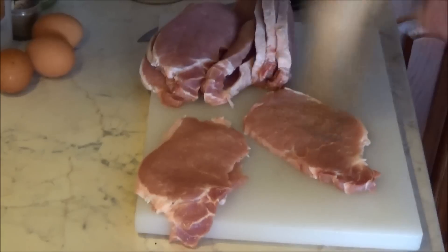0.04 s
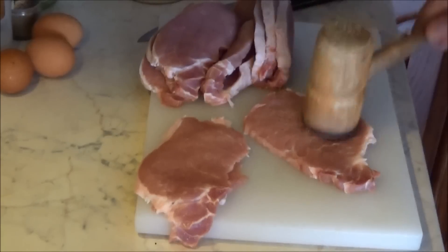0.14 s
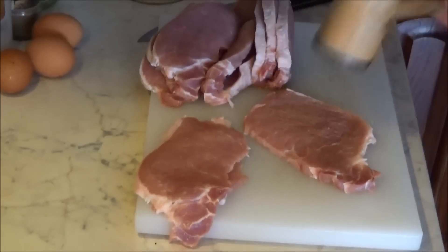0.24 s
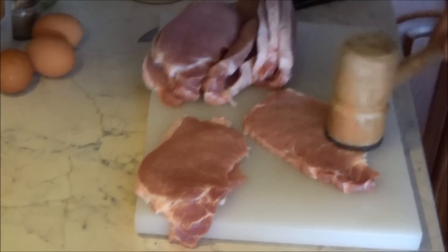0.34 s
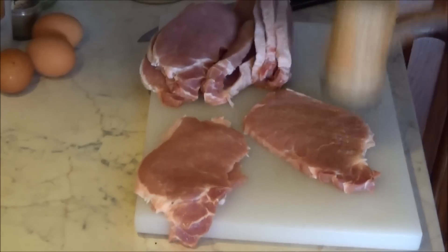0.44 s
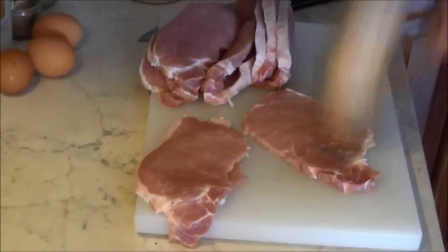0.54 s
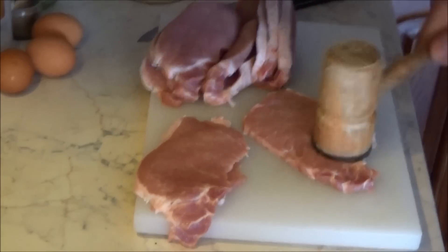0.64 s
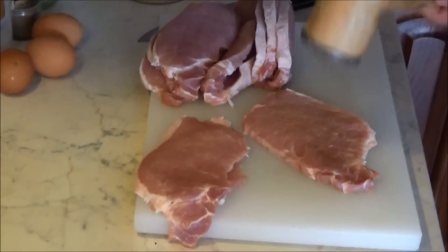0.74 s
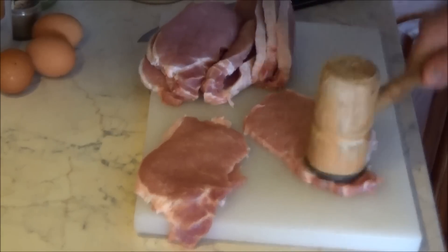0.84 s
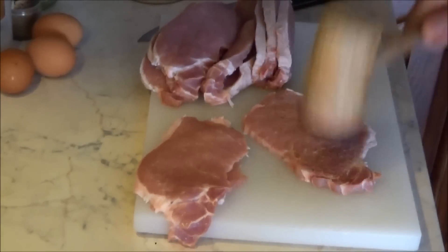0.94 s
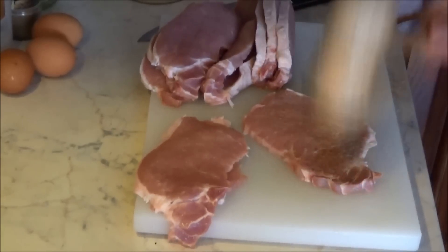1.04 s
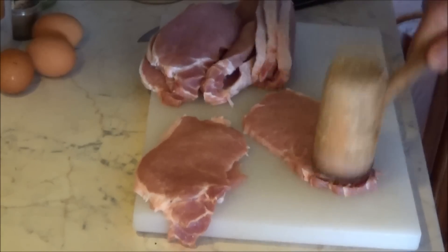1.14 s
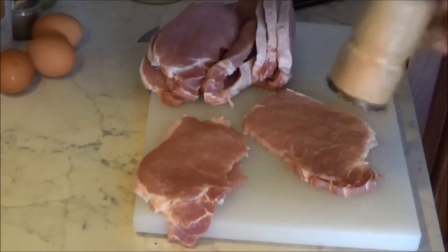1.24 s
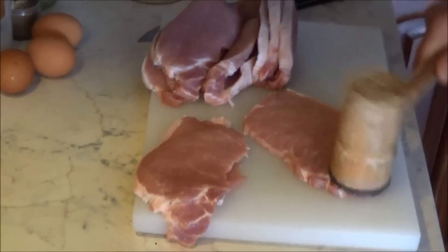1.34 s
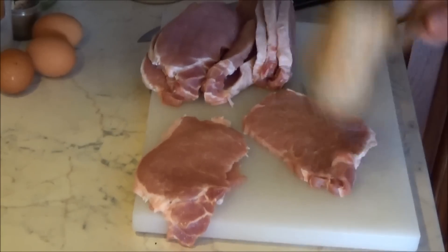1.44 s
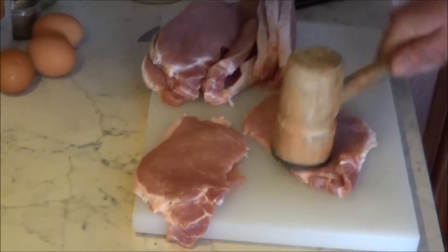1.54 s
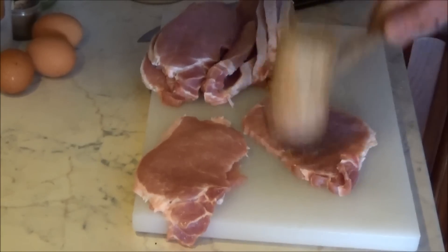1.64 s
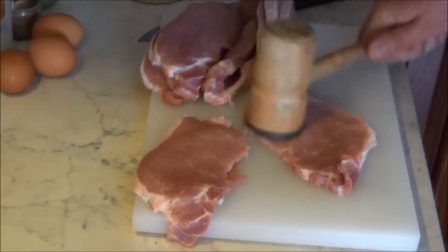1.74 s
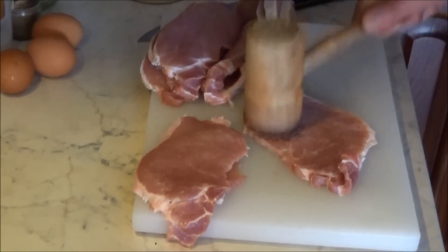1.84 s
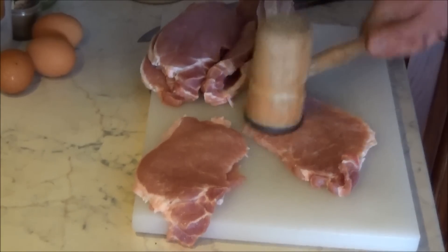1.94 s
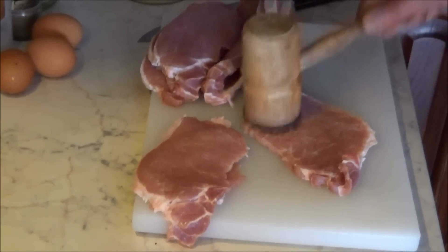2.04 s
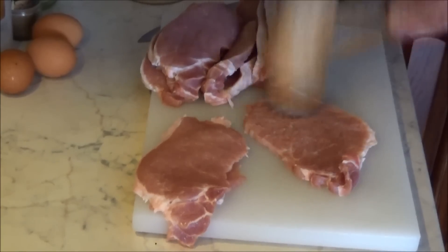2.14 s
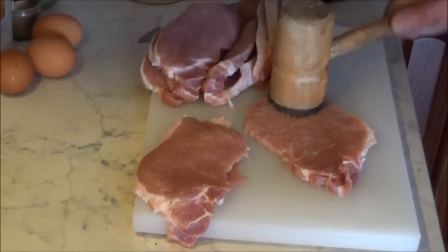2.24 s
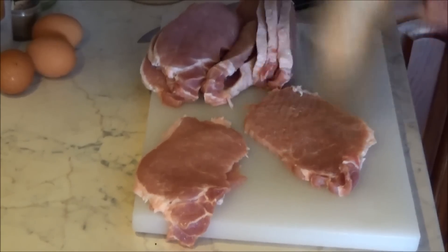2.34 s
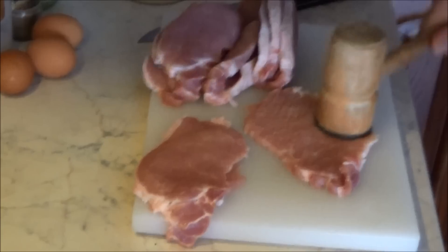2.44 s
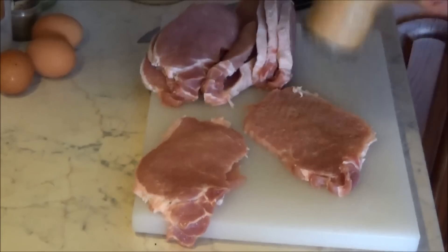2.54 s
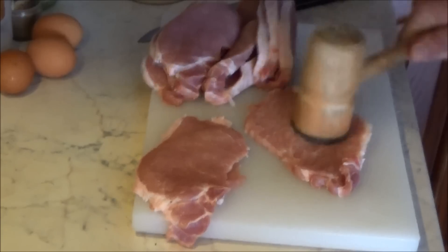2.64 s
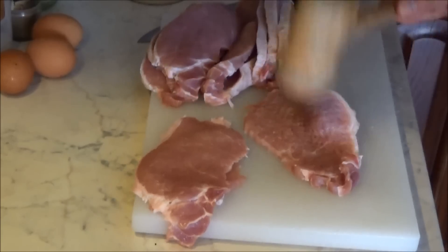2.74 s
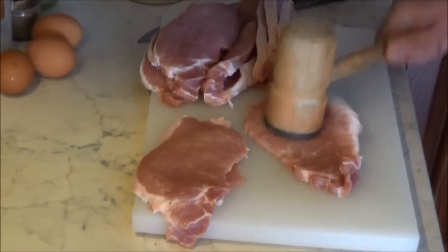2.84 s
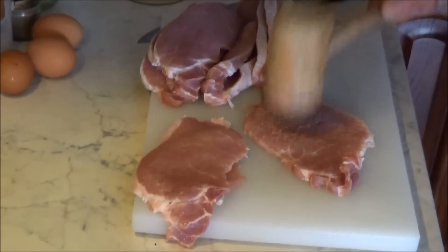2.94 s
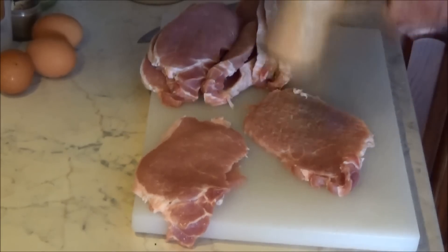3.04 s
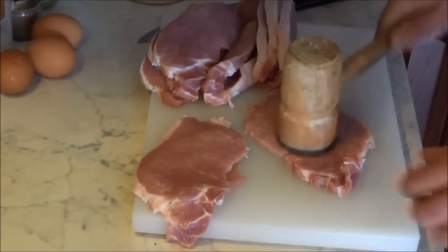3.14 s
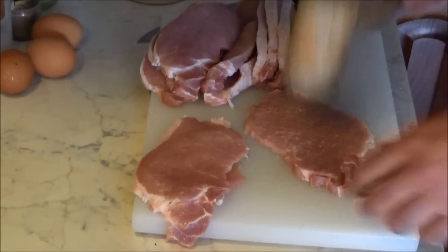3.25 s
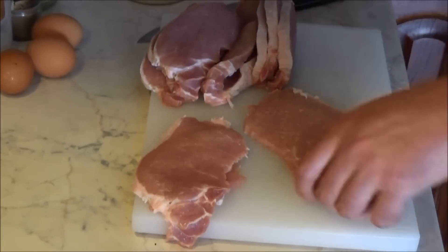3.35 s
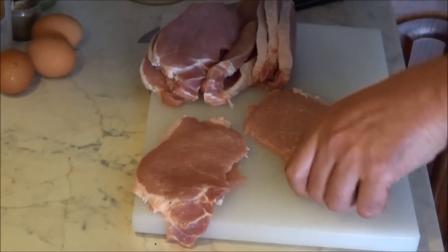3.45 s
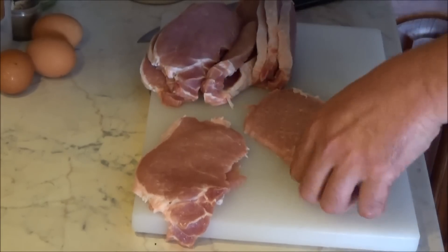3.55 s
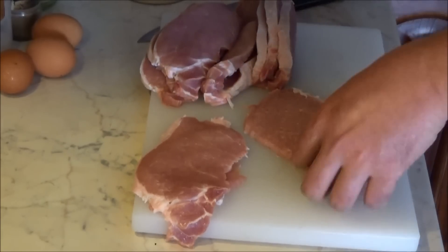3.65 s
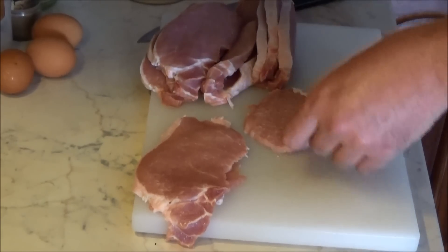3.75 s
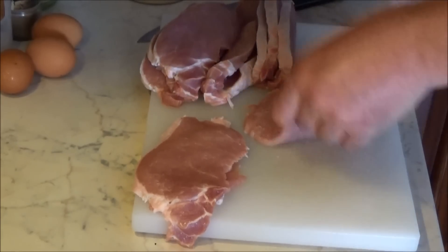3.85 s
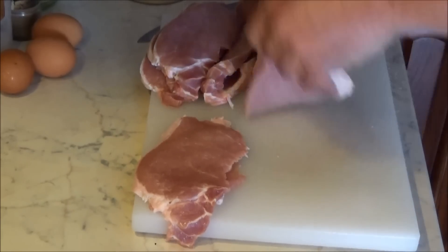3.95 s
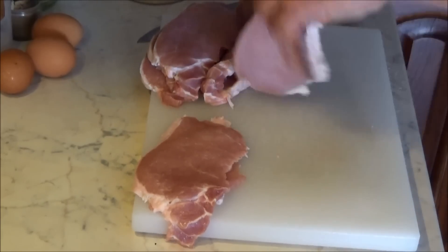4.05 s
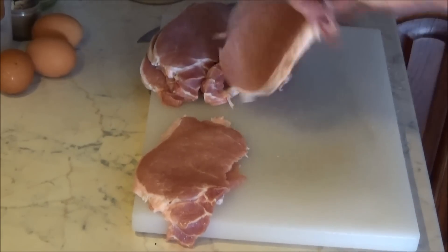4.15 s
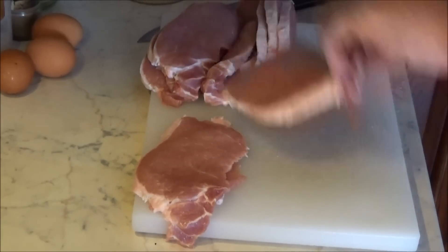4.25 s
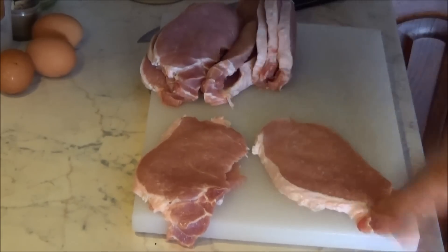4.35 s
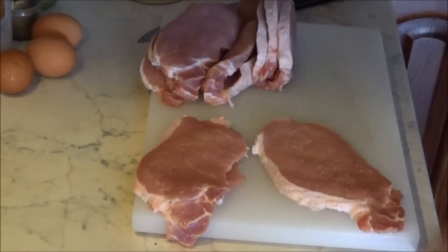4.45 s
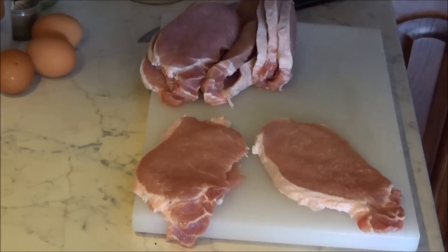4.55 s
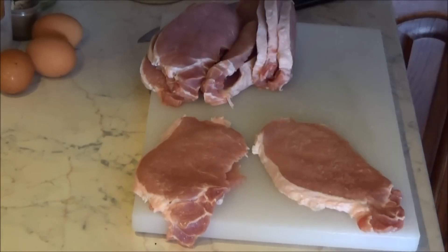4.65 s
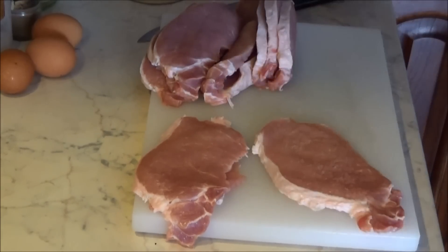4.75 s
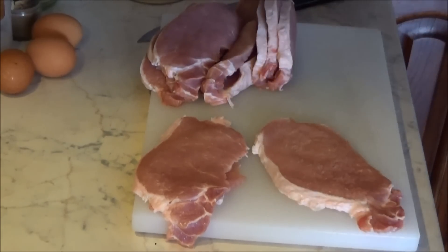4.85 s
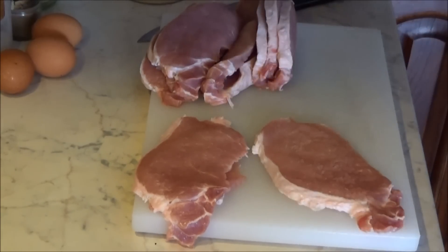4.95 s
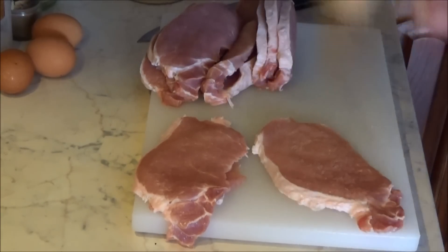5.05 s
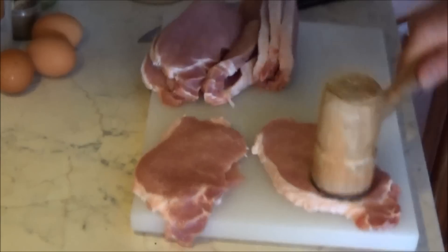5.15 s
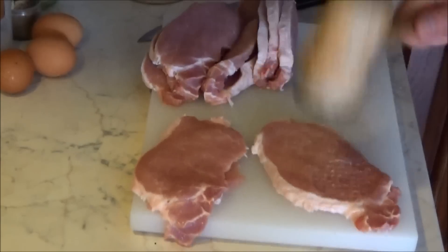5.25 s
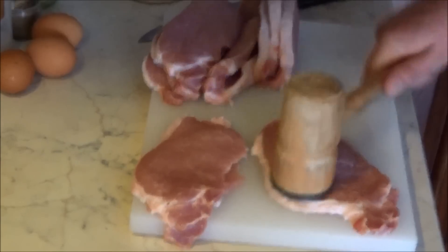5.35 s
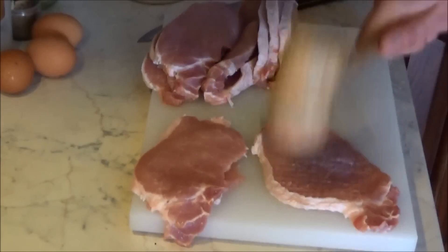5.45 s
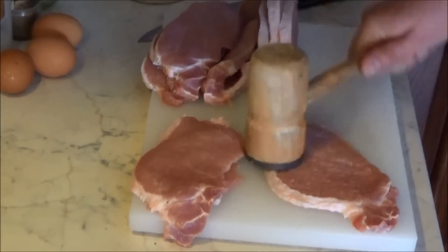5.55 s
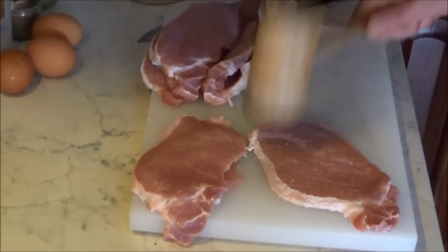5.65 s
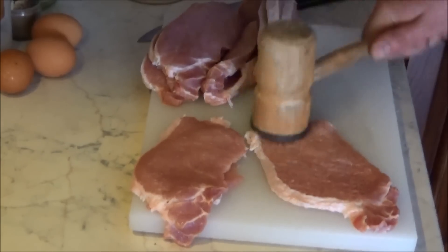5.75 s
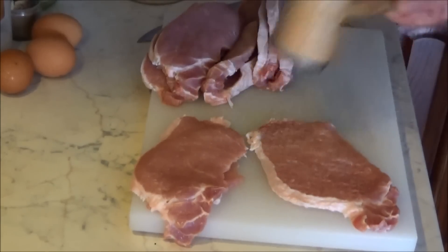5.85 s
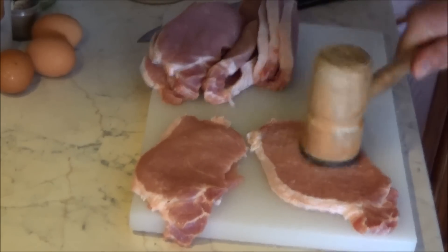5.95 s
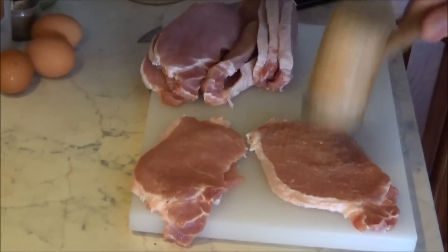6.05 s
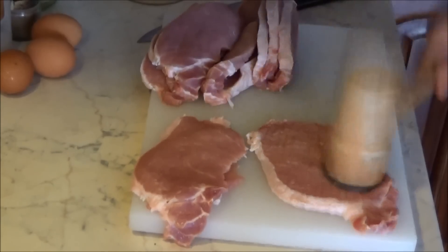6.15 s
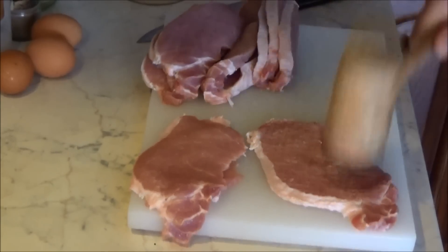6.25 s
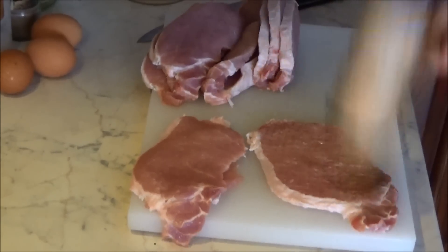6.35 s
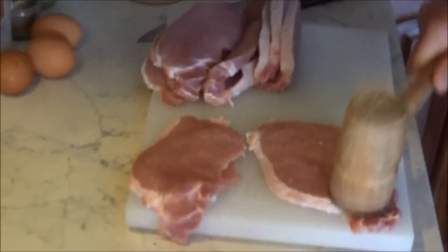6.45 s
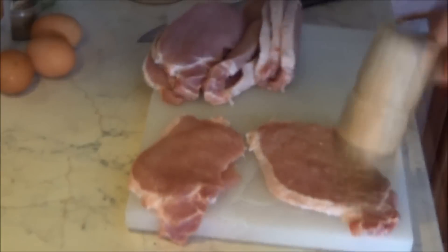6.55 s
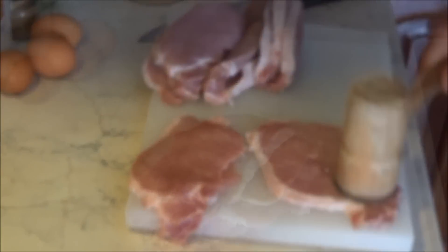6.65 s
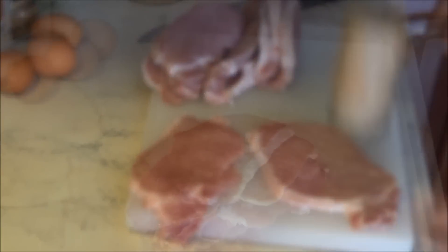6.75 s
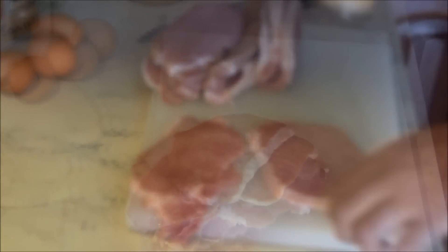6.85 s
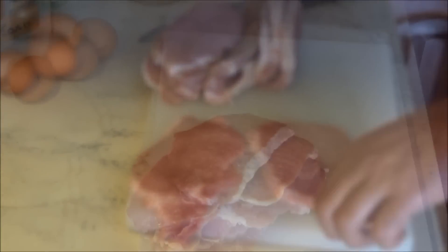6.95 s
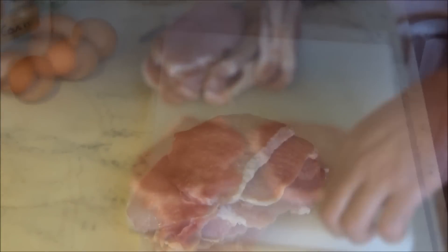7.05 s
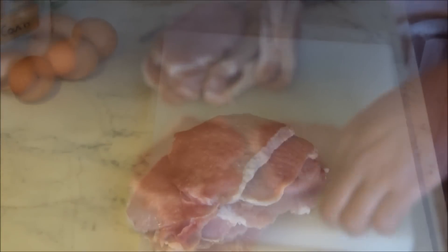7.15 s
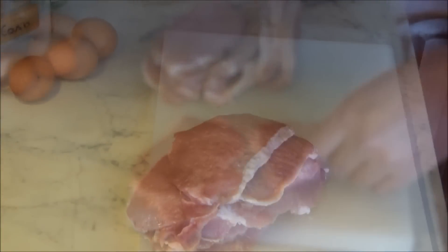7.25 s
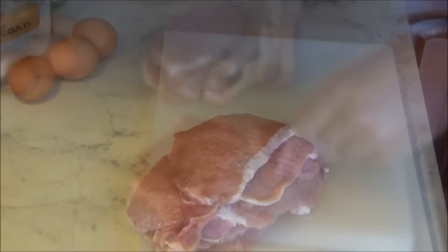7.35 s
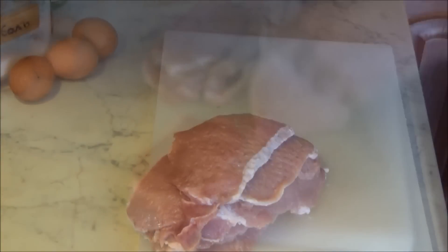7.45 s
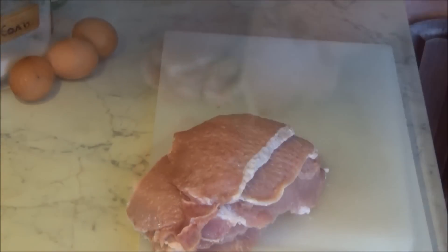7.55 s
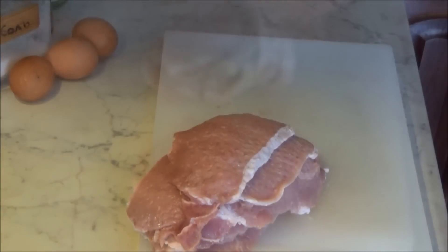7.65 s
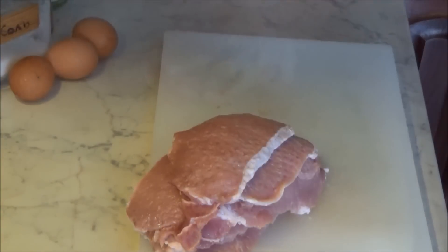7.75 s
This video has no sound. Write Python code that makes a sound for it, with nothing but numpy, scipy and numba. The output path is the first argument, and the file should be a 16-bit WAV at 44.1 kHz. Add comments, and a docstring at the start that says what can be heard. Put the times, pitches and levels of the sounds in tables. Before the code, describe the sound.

Fast, regular mallet blows thud and smack on meat, making the counter shudder and loose crockery clink in a lively small room. A quiet gap holds faint hum, sticky peeling and one dry, close wet slap. Eight more blows come, the first strong, then a rough moist rustle with sharp crackles ends it. Recorded close in stereo, with peaks flattened.

```python
"""Mallet blows are heard first: a wooden mallet pounds pork on a plastic board on a kitchen counter.
Each cracks as shaped noise, booms in cabinet modes, rattles ringing crockery and decays in a tiled room.
Between two runs of blows a hand peels the slice off, as grains and crackles of noise, and slaps it down;
at the end hands rustle and a faint drone sets in. Noise and mains tones hum under it all, with an even tick.
Two ports receive the mixture and a limiter flattens the blows."""
import sys
import numpy as np
from scipy import signal
from scipy.fft import rfft, irfft, next_fast_len
from scipy.io import wavfile
from numba import njit

SR = 44100
rng = np.random.default_rng(int(sys.argv[2]) if len(sys.argv) > 2 else 0)


def dump(signal):
    """Clip the signal to [-1, 1] and save it as 16-bit WAV at the path in sys.argv[1]."""
    limited = np.clip(np.atleast_2d(signal).T, -1, 1)
    pcm = np.round(limited * 32767).astype(np.int16)
    wavfile.write(sys.argv[1], SR, pcm)


N = 343362


def undb(db):
    """Level to amplitude: 20 dB is a factor of ten."""
    return 10 ** (np.asarray(db) / 20)


def at(hz, table, column=1):
    """Logarithmic pitch: interpolate a table column along log frequency, holding the end values."""
    table = np.array(table, float)
    return np.interp(np.log(hz), np.log(table[:, 0]), table[:, column])


def over_time(table):
    """Level envelope: amplitude at every sample from a table of (time [s], level [dB])."""
    return undb(np.interp(np.arange(N) / SR, *np.transpose(table)))


def spikes(s, size):
    """Impulse excitation: single-sample impulses at the given times."""
    index = np.clip((np.asarray(s) * SR).astype(int), 0, N - 1)
    return np.bincount(index, size, N)


def fade(x, t60):
    """Exponential decay: each impulse dies away by 60 dB in t60 seconds."""
    return signal.lfilter([1], [1, -1000 ** (-1 / (t60 * SR))], x)


def ring(x, hz, t60):
    """Damped resonance: a unit impulse sets off one decaying sine whose envelope starts at 1."""
    r, w = 1000 ** (-1 / (t60 * SR)), 2 * np.pi * hz / SR
    return signal.lfilter([np.sin(w)], [1, -2 * r * np.cos(w), r * r], x)


def lumps(rate):
    """Random modulation: normal random knots, rate per second, joined by straight lines."""
    knots = int(N / SR * rate) + 2
    return np.interp(np.arange(N) / SR * rate, np.arange(knots), rng.standard_normal(knots))


# third-octave band centres [Hz]
BANDS_HZ = 30 * 2 ** (np.arange(28) / 3)


def noise(colour, shape=None, count=N):
    """Filtered noise: two unrelated rows of rms 1; shape(hz), if given, is each third octave's envelope."""
    size = next_fast_len(count)
    f = np.maximum(np.arange(size // 2 + 1) * SR / size, 1)
    spectrum = rfft(rng.standard_normal((2, size))) * undb(at(f, colour))
    spectrum /= np.sqrt(np.mean(abs(spectrum) ** 2) / size)
    if shape is None:
        return irfft(spectrum, size)[:, :count]
    thirds = 3 * np.log2(f)
    total = 0
    for hz in BANDS_HZ:
        # triangular bands overlap so that neighbours add up to one
        band = np.clip(1 - abs(thirds - 3 * np.log2(hz)), 0, 1)
        total = total + shape(hz) * irfft(spectrum * band, size)[:, :count]
    return total


# Mallet blows: (time [s], strength [dB], then accents of this blow: board thud [dB], flat smack [dB],
# bright hiss [dB], dishes rattling [dB], woody ring [dB])
MALLET_BLOWS = [(0.0, -26.5, 6, 0.5, -7, 6.5, 4.5), (0.258, -25, 2, -4, 16, -1, 4),
                (0.4957, -26.5, 1.5, -8, -6, 0, 1.5), (0.77, -25, -4, 0, 0, 3, 1),
                (1.024, -30.5, -5, 1.5, 20, -11, -10), (1.259, -30, -3.5, 11.5, -3.5, 0, -5),
                (1.481, -29.5, -2.5, -6.5, 4, -3, -8), (1.7237, -33.5, 0.5, 12.5, 0, -9, -2),
                (1.934, -33.5, 2, -9, 9, -3, -1.5), (2.148, -32.5, 2.5, -6, 15, 6.5, -2),
                (2.361, -31, 4.5, 3, -8, 2, -9), (2.578, -31, 0, 4, -6.5, 2, -1),
                (2.811, -31, 1.5, -3, -2.5, 7.5, 3), (3.029, -34, -1, -2.5, 15, -4.5, -0.5),
                (3.267, -32, 1.5, 0.5, 13.5, 2, -14), (5.278, -22, -3, 5, -3, 9, 3),
                (5.52, -31, -4.5, 10, 5, 5, -2), (5.718, -33.5, 4, 2, 7, -2, 2),
                (5.921, -32.5, 7, -1, -5, 6.5, -1), (6.137, -34, -4.5, -1, 28, 7, -15),
                (6.356, -30, -8.5, 10, 19, 3, 4.5), (6.579, -27.5, -1.5, 2, -1.5, 5, -1.5),
                (6.784, -28.5, -7, -4.5, 6.5, -10, -4)]
# How a blow spreads over pitch; the more the board thuds, the less the cabinets boom:
# (frequency [Hz], level against strength [dB], share of thud [1], share of smack [1], share of hiss [1])
BLOW_SPREAD = [(98.7, -3.5, -0.35, 0, 0.048), (279, 4, 1, 0, 0.074), (392, 4.5, 0.18, 0, 0),
               (1010, 4.5, -0.02, 0.37, 0), (1370, 1, 0.53, 1, 0), (1620, 3, 0.38, 0.85, 0.086),
               (1970, -2, 0.12, 0.25, 0), (5640, -1.5, 0.41, 0.23, 0.17), (12330, 9.5, 0.56, 0.11, 0.29)]


def part(hz):
    """Impact spectrum: amplitude of every blow at this pitch, from its strength and accents."""
    strength_db, *accents_db = np.array(MALLET_BLOWS)[:, 1:5].T
    db = strength_db + at(hz, BLOW_SPREAD)
    for column, accent in enumerate(accents_db, 2):
        db = db + accent * at(hz, BLOW_SPREAD, column=column)
    return undb(db)


# Reverberation of the tiled kitchen: (frequency [Hz], decay by 60 dB [s], build-up time constant [ms])
KITCHEN_DECAY = [(60, 0.37, 28), (205, 0.45, 6.8), (620, 0.39, 17.8), (2050, 0.42, 10.4), (7540, 0.39, 9.8),
                 (15200, 0.26, 5)]


def in_kitchen(hits, hz, wet_db, crack_s):
    """Reverberation: a short crack plus a tail that builds up, slowest in the bass, and decays."""
    rise = at(hz, KITCHEN_DECAY, column=2) / 1000 * np.log(1000)  # time constant to t60
    tail = fade(hits, at(hz, KITCHEN_DECAY)) - fade(hits, rise)
    return fade(hits, crack_s + 8 / hz) + undb(wet_db) * tail


# Colour of the blows: (frequency [Hz], relative level per Hz [dB])
BLOW_COLOUR = [(28, -32), (48, 10), (201, -3.5), (352, -4), (866, -11), (1340, -8), (4100, -11),
               (5630, -11.5), (7000, -20.5), (11700, -22), (16000, -31.5)]


def crack_and_wash(s):
    """Diffuse sound field: the crack and room tail of every blow as noise, each band swelling at random."""
    def envelope(hz):
        return undb(1.9 * lumps(40)) * in_kitchen(spikes(s, part(hz)), hz, wet_db=11.0, crack_s=0.038)
    return undb(13.5) * noise(BLOW_COLOUR, envelope)


def snap(s):
    """Short damped resonance: the toothed face meets the meat with a dry snap."""
    return undb(10.0) * sum(ring(spikes(s, part(hz)), hz, 20 / hz + 0.0024) for hz in (1400, 3500, 10500))


# Panel modes of the cabinets: (frequency [Hz], relative level [dB], decay by 60 dB [s])
CABINET_MODES = [(50, -4, 0.37), (79, 6.5, 0.31), (113.5, 6, 0.25), (139.7, 2, 0.29), (267.2, -5, 0.25),
                 (279.7, -8.5, 0.25), (365.6, -14.5, 0.39), (430, -7.5, 0.12), (510.5, -8, 0.19),
                 (573.8, -13.5, 0.22), (1090, -17, 0.22), (1314, -12.5, 0.14), (2444, -10, 0.1),
                 (3060, -18, 0.15)]


def cabinets(s):
    """Modal resonance: the board bounces on its cloth and drives the cabinet panels three times a blow."""
    shudder_s, shudder_db = .12, -31  # the board chatters on the counter and roughens the boom
    woody_db = np.array(MALLET_BLOWS)[:, [6]]
    boom = np.zeros(N)
    for hz, db, t60 in CABINET_MODES:
        lands = s[:, None] + np.array([.004, .015, .034]) + .0005 * rng.random((len(s), 3))
        force = part(hz)[:, None] * np.array([.7, 1.1, .6])
        force *= undb(1.0 * rng.standard_normal((len(s), 3)))
        if 340 < hz < 400:
            force *= undb(woody_db)
        push = spikes(lands.ravel(), force.ravel())
        push += undb(shudder_db) * fade(push, shudder_s) * rng.standard_normal(N)
        # big panels take a few cycles to get going
        boom += undb(db + 18.5) * (ring(push, hz, t60) - ring(push, hz, 17 / hz))
    return boom


# Modes of the crockery: (frequency [Hz], relative level [dB], decay by 60 dB [s])
CROCKERY_MODES = [(2379, -3, .3), (2617, -17, .75), (3295, -5, .4), (3542, -11, .6), (4549, -16, .75),
                  (5453, -8, .2), (6412, -15, .6), (10309, -5, .15), (10562, -6, .16), (10858, -8, .14),
                  (11590, -9, .15), (12543, -9, .14), (12898, -10, .14)]
# Clear clinks among the rattle, each on the nearest crockery mode: (time [s], frequency [Hz], level [dB])
CLEAR_CLINKS = [(.03, 10309, -7), (.78, 10562, -6.5), (0.34, 4549, -23.5), (.80, 6412, -30),
                (.33, 3295, -26), (.30, 11590, -9), (.30, 12543, -17), (.56, 2617, -29.5),
                (.6, 3542, -32.5), (.79, 2617, -26), (.80, 3542, -21), (2.18, 3542, -21.5),
                (2.2, 3295, -23), (5.38, 3542, -31), (5.33, 11590, -9), (5.33, 12543, -14),
                (5.76, 10858, -19), (5.95, 10858, -14), (5.95, 12898, -9), (6.0, 3542, -29),
                (6.62, 10309, -12)]


def crockery(s):
    """Repeated impact: loose dishes knock together after each blow and ring in their own modes."""
    rattle_s, fall_db = .12, -5.5  # span of the knocks and their level change across it
    dishes = np.array(CROCKERY_MODES)[:, 0]
    late = rng.random((len(s), 18))
    loose = undb(np.array(MALLET_BLOWS)[:, 5])

    def knock(hz):
        times = s[:, None] + rattle_s * late
        size = (part(hz) * loose)[:, None] * rng.uniform(0, 1.6, late.shape) * undb(fall_db * late)
        return spikes(times.ravel(), size.ravel())

    out = np.zeros((2, N))
    out[0] += undb(4.5) * sum(ring(knock(hz), hz, 0.00082) for hz in (5500, 9000, 12500))  # dry clicks
    for hz, db, t60 in CROCKERY_MODES:
        push = undb(db - 9) * knock(hz)
        for t, clink_hz, level in CLEAR_CLINKS:
            if dishes[abs(dishes - clink_hz).argmin()] == hz:
                push = push + spikes([t], [undb(level)])
        side = .5 * rng.standard_normal()  # sets the mode off centre
        out += np.array([[1], [side]]) * ring(push, hz, t60)
    return out


def odds_and_ends(s, count=36):
    """Modal density: each blow jolts a random handful of many loose things in the drawers; each rings briefly."""
    out, t = np.zeros(N + SR), np.arange(int(.3 * SR)) / SR
    pool_hz = 1800 * 7.5 ** rng.random(240)
    pick, late, size = rng.random((3, len(s), count))
    for k in range(len(s)):
        hz = pool_hz[(pick[k] * len(pool_hz)).astype(int)][:, None]
        since = np.maximum(t - .09 * late[k][:, None] ** 2, 0)  # seconds since each was jolted
        colour = undb(at(hz, BLOW_COLOUR) + 3.0 * np.log10(hz / 1000))
        gain = part(hz)[:, [k]] * colour * size[k][:, None]
        decay = np.exp(-np.log(1000) * since / (0.54 * at(hz, KITCHEN_DECAY)))
        rings = gain * np.sin(2 * np.pi * hz * since) * decay
        start = int(s[k] * SR)
        out[start:start + len(t)] += rings.sum(axis=0) * np.cos(np.pi / 2 * t / t[-1])
    return out[:N]


# The pounding drops in level from 6.85 s on: (time [s], level [dB])
POUNDING_DROP = [(6.85, 0), (6.98, -7)]


def mallet():
    """Superposition: crack and wash, cabinet boom, crockery, drawer contents and snap add up in each blow."""
    s = np.array(MALLET_BLOWS)[:, 0]
    out = crack_and_wash(s) + crockery(s)
    out[0] += cabinets(s) + undb(18.0) * odds_and_ends(s) + snap(s)
    return out * over_time(POUNDING_DROP)


# Colour of the appliance hum: (frequency [Hz], relative level per Hz [dB])
HUM_COLOUR = [(18, -32), (30, -11), (55, -14), (70, -8), (103, -4.5), (221, -9.5), (259, -6.5), (473, -10),
              (684, -14), (1760, -17.5), (4910, -26.5), (16000, -34)]
# Course of the hum: (time [s], level [dB])
HUM_COURSE = [(0, -65), (3.6, -53), (4.2, -55), (4.75, -50.5), (5.25, -49), (7.05, -44.5), (7.35, -41.5),
              (7.79, -42)]
# Mains tones: (frequency [Hz], level against the hum [dB])
MAINS_TONES = [(51, -6), (102, -6.5)]
# A faint drone that sets in late: (time [s], level [dB])
DRONE_COURSE = [(7.08, -62), (7.12, -50), (7.45, -49), (7.79, -77)]


def hum():
    """Stationary noise and pure tones: appliances hum, with a faint even tick and a late narrow-band drone."""
    tick_start_s, tick_gap_s, tick_hz, tick_db = .008, .04, 3430, -4  # dB against the hum
    drone_hz = 613
    time = np.arange(N) / SR
    times = np.arange(tick_start_s, N / SR, tick_gap_s)
    ticks = fade(spikes(times, undb(tick_db + 0.92 * rng.standard_normal(len(times)))), 0.05)
    tick = noise([(tick_hz * .7, -25), (tick_hz, 0), (tick_hz * 1.15, -25)])
    drone = noise([(drone_hz * .85, -30), (drone_hz, 0), (drone_hz * 1.15, -30)])
    drone_level = undb(np.interp(time, *np.transpose(DRONE_COURSE), left=-np.inf))
    mains = sum(undb(db) * np.sqrt(2) * np.sin(2 * np.pi * hz * time) for hz, db in MAINS_TONES)
    bed = noise(HUM_COLOUR) + ticks * tick
    bed[0] += mains
    return over_time(HUM_COURSE) * bed + drone_level * drone


# Wet meat peels, then hands rustle; one list for each: (time [s], sticky hiss level [dB], rub level [dB])
HAND_MOVES = [
    [(3.62, -67, -64), (3.708, -55.5, -75), (4.108, -46, -60), (4.166, -48, -58), (4.22, -69, -62),
     (4.47, -63, -62)],
    [(7.08, -66, -52), (7.1, -57, -50.5), (7.53, -46, -44), (7.64, -31, -24), (7.73, -34.5, -29),
     (7.786, -42, -32.5)],
]
# Loudest crackles of wet meat letting go: (time [s], level [dB])
LOUD_CRACKLES = [(3.76, -53), (3.7895, -48), (3.926, -48), (3.999, -49), (4.1387, -43), (4.167, -46),
                 (7.5526, -23), (7.572, -23), (7.6032, -16.5), (7.635, -24), (7.6624, -25), (7.721, -21)]
# Colours of the sticky hiss and of the rub: (frequency [Hz], relative level per Hz [dB])
STICKY_COLOUR = [(3000, -23), (5500, -4), (7500, -6.5), (12000, 6), (16000, -6)]
RUB_COLOUR = [(120, -44.5), (200, -27), (580, 1.5), (754, -3.5), (1090, -1), (2060, -5), (8000, -18.5),
              (11000, -43)]


def hands():
    """Stick-slip and friction: sticky hiss and rub of dense uneven grains, with single crackles."""
    grains_per_s, crackles_per_s = 500, 70
    moves = []
    for t in HAND_MOVES:  # silent before and after each move
        moves += [[t[0][0] - .03, -99, -99], *t, [t[-1][0] + .01, -99, -99]]
    s, sticky_db, rub_db = np.transpose(moves)

    grain_hits = undb(2.0 * rng.exponential(1, (2, N))) * (rng.random((2, N)) < grains_per_s / SR)
    grains = fade(grain_hits, 0.01) + 4.1  # grains stand on a steady floor
    grains /= np.sqrt(np.mean(grains ** 2))

    small = rng.uniform(0, 2, N) * (rng.random(N) < crackles_per_s / SR)
    crackle_s, crackle_db = np.transpose(LOUD_CRACKLES)
    loud = fade(spikes(crackle_s, undb(crackle_db)), 0.0047)
    sticky = grains[0] * over_time(list(zip(s, sticky_db))) * (1 + fade(small, 0.008)) + loud
    rub = grains[1] * undb(2.7 * lumps(30)) * over_time(list(zip(s, rub_db)))
    # each loud crackle drags a duller scuff
    scuff_envelope = fade(spikes(crackle_s, undb(crackle_db - 10)), 0.16)
    scuffs = noise([(900, -16), (2200, -1), (4500, -17)]) * scuff_envelope
    return noise(STICKY_COLOUR) * sticky + noise(RUB_COLOUR) * rub + scuffs


# The slice lands, edge first: (time [s], level [dB])
SLICE_LANDINGS = [(4.496, -24.5), (4.506, -18.5), (4.5123, -16.5), (4.518, -16.5)]
# Colour of the wet smack: (frequency [Hz], relative level per Hz [dB])
SMACK_COLOUR = [(90, -28), (280, -19), (450, -19), (750, -14), (1250, 1), (2000, -2), (8480, -9),
                (11100, -3), (16000, -21)]


def slap():
    """Direct-to-reverberant ratio: wet smacks far drier than the blows, then a dull late board thump."""
    thump_late_s, thump_db = .012, -19.5
    s, db = np.transpose(SLICE_LANDINGS)
    start = int(s[0] * SR)
    hits = spikes(s, undb(db))[start:start + SR]

    def envelope(hz):
        return in_kitchen(hits, hz, wet_db=-12 - 3.8 * np.log2(hz / 1000), crack_s=0.036)

    smack = noise(SMACK_COLOUR, envelope, count=SR)
    late_hits = np.roll(hits, int(thump_late_s * SR))
    thump_envelope = fade(late_hits, 0.31) - fade(late_hits, 0.11)
    thump = thump_envelope * noise([(150, -12), (320, 0), (700, -27.0)], count=SR)
    return np.pad(smack + undb(thump_db) * thump, ((0, 0), (start, N - start - SR)))


# Differences between the two ports:
# (frequency [Hz], left minus right level [dB], left phase lead [rad], unlike share [1])
PORT_DIFFERENCES = [(60, -4.2, -.65, .15), (260, -2.5, -.8, .33), (700, -.7, -.3, .44), (2400, .5, 0, .4),
                    (6000, .4, 0, .4), (10000, 0, 0, .13), (16000, 0, 0, .03)]


def scene():
    """Interaural coherence: two close ports share most sound; the right has louder, earlier bass."""
    size = next_fast_len(N)
    common, apart = rfft(mallet() + hum() + hands() + slap(), size)
    f = np.maximum(np.arange(len(common)) * SR / size, 1)
    # half of each difference goes to either side
    lean = undb(at(f, PORT_DIFFERENCES) / 2) * np.exp(.5j * at(f, PORT_DIFFERENCES, column=2))
    share = np.clip(at(f, PORT_DIFFERENCES, column=3), 0, .95)
    alike = np.sqrt(1 - share ** 2) * common
    left = lean * (alike + share * apart)
    right = (alike - share * apart) / lean
    return irfft([left, right])[:, :N]


@njit
def follow(x, attack, release):
    """Envelope detection: one-pole smoothing with a quick attack and a slower release."""
    out, e = np.empty(len(x)), 0.
    for i in range(len(x)):
        e += (x[i] - e) * (attack if x[i] > e else release)
        out[i] = e
    return out


def record(dry):
    """Dynamic compression: deepest bass removed, blows held down by a limiter, then the top cut off."""
    low_hz, top_hz = 30, 16000
    knee_db, attack_s, release_s = -8.5, .0008, .0028
    dry = signal.sosfilt(signal.butter(2, low_hz, "high", fs=SR, output="sos"), dry)
    level = follow(abs(dry).max(axis=0), 1 / (attack_s * SR), 1 / (release_s * SR))
    gain = (1 + (level / undb(knee_db)) ** 2) ** -.45
    held = 0.71 * np.tanh(dry * gain / 1.227)  # soft clipping rounds the peaks
    return signal.sosfilt(signal.ellip(10, .2, 70, top_hz, fs=SR, output="sos"), held)


dry = scene()
out = record(dry)
dump(out)
```